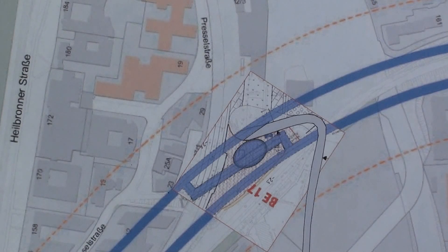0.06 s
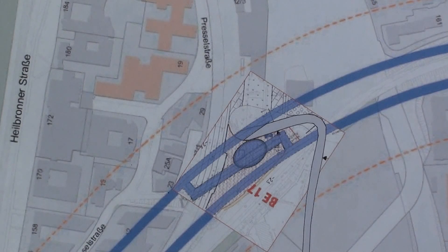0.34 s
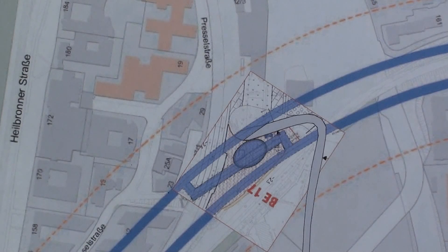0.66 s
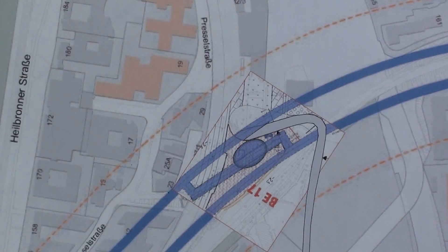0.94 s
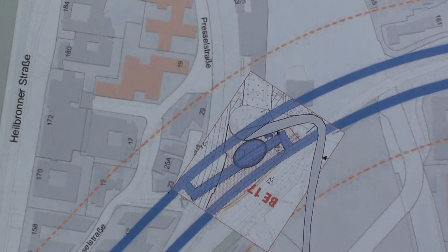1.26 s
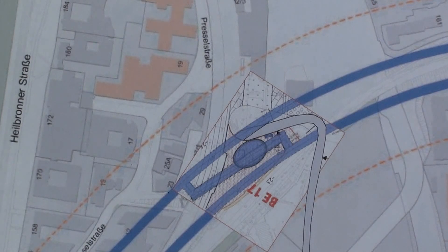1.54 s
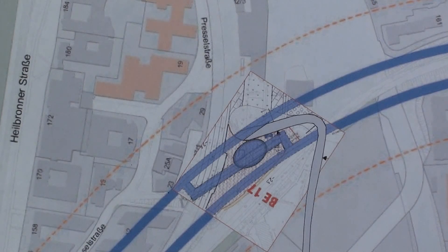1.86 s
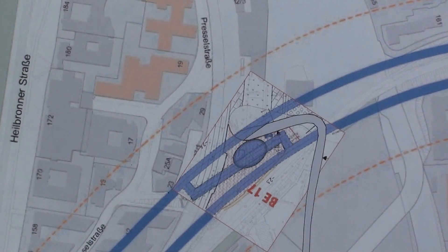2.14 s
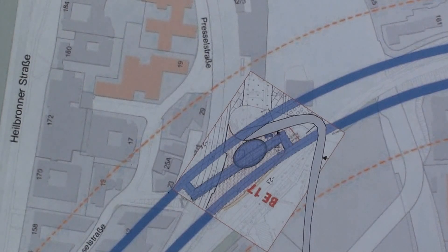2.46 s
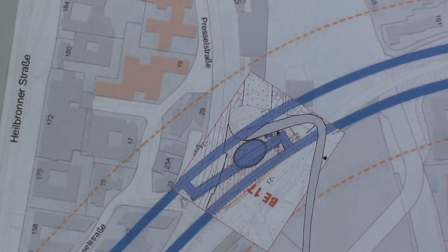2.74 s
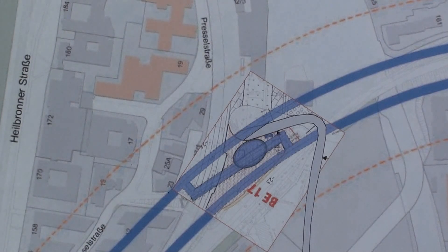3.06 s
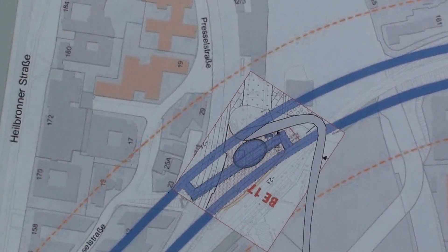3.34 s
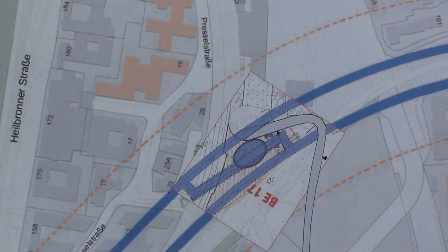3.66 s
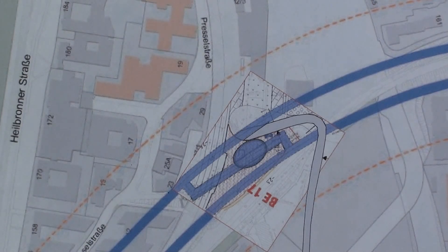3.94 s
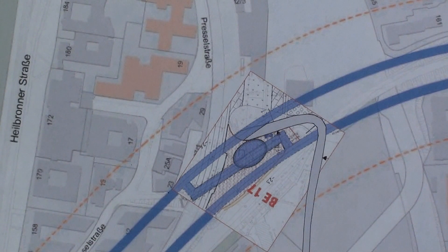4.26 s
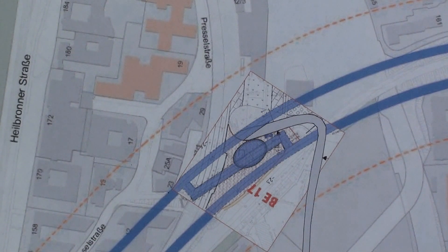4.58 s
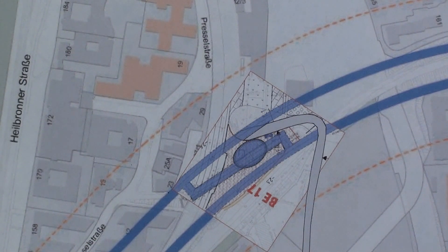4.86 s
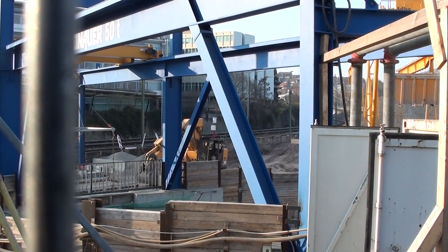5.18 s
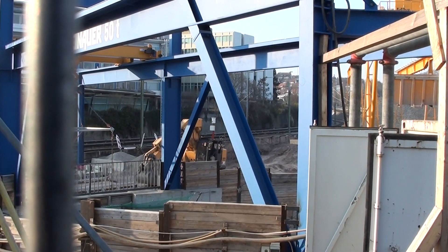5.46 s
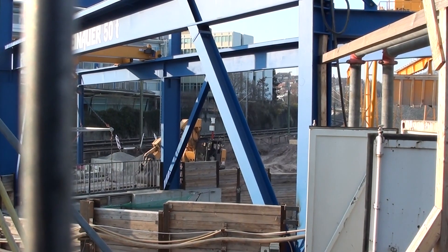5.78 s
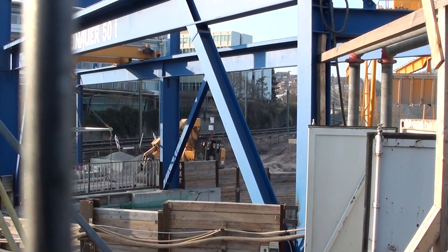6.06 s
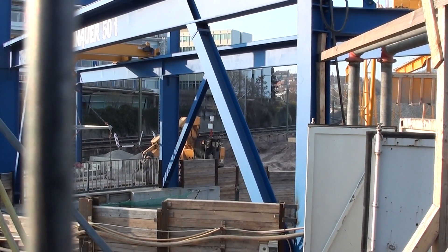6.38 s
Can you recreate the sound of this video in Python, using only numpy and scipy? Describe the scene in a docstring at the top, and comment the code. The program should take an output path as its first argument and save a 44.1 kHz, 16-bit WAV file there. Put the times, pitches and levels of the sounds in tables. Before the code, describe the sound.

Quiet room hiss with tiny lens motor ticks gives way to a rumbling, whining crane and a small bird chirping.

```python
"""First, a quiet room: microphone hiss, a faint ventilation drone and the tiny twitches of a camcorder's
lens motor, each one ringing the lens barrel. Just after five seconds this fades out and a building site
fades in: a gantry crane's machinery rumbles and the switched current of its inverter drive whines.
A small bird chirps three times between the walls, a little grit trickles down, and the bird calls twice
more over the crane."""
import sys
import numpy as np
from scipy import signal
from scipy.fft import rfft, irfft, next_fast_len
from scipy.io import wavfile
from scipy.ndimage import map_coordinates

SR = 44100
rng = np.random.default_rng(int(sys.argv[2]) if len(sys.argv) > 2 else 0)


def materialize(psi):
    """Save the field psi as 16-bit PCM at rate SR to the path in sys.argv[1].

    A 1-D psi becomes a single channel; in a 2-D psi each row is a channel.
    """
    bounded = np.clip(np.atleast_2d(psi).T, -1, 1)
    quanta = np.round(bounded * 32767).astype(np.int16)
    wavfile.write(sys.argv[1], SR, quanta)


N = 283122

# twitches of the lens motor: centre_s, relative_peak_db, length_s
LENS_TWITCHES = [(0.0348, -40, 0.0056), (0.1466, -38, 0.0071), (0.2284, -43, 0.009),
                 (0.4264, -39.5, 0.0058), (0.4634, -39.5, 0.0057), (1.015, -41.5, 0.0068),
                 (1.3399, -46.5, 0.0068), (1.4357, -40, 0.0063), (1.486, -39.5, 0.0072),
                 (1.699, -40.5, 0.006), (1.8173, -39, 0.0068), (2.2385, -37, 0.0064),
                 (2.516, -37.5, 0.0056), (2.6706, -40.5, 0.0095), (3.0111, -38, 0.0061),
                 (3.06, -42.5, 0.0091), (3.1023, -40.5, 0.0068), (3.1787, -44, 0.006),
                 (3.8723, -39.5, 0.0073), (3.9799, -37.5, 0.0074), (4.0405, -39, 0.0063),
                 (4.1265, -49.5, 0.0068), (4.1875, -39.5, 0.0064), (4.626, -38.5, 0.0082),
                 (4.7656, -42, 0.0064), (4.983, -42, 0.006)]
# resonances of the lens barrel: pitch_hz, width_hz, relative_level_db
BARREL_MODES = [(2481, 90, -7.5), (3855, 170, 0), (4750, 180, -7), (5200, 175, -5.5), (5610, 220, -13),
                (8280, 300, -14.5), (8640, 250, -14.5)]
# colour of the crane's rumble: frequency_hz, relative_density_db
RUMBLE_COLOUR = [(15, -46), (25, -27), (54, -10), (172, -8), (238, -0.5), (384, -6.5), (439, -4.5),
                 (595, -5.5), (707, -3.5), (1430, -14), (1580, -15.5), (1730, -16), (2100, -15.5),
                 (2400, -27), (3120, -28), (5280, -120)]
# fader ride on the rumble: time_s, relative_level_db
RUMBLE_RIDE = [(5.15, -28.5), (6.274, -28), (6.4, -29)]
# colour of the machinery's hiss: frequency_hz, relative_density_db
HISS_COLOUR = [(1700, -29), (2300, 3), (3000, 1.5), (4200, -2), (5200, -8.5), (6500, -9.5), (7800, -10.5),
               (9500, -14.5), (12000, -19.5), (15700, -19)]
# stereo image of the site, 1 is mono: frequency_hz, left_right_likeness
SITE_IMAGE = [(60, 1), (200, 0.99), (380, 0.98), (1300, 0.9), (2400, 0.91), (4400, 0.68), (8100, 1),
              (15000, 1)]
# motor and gear tones: pitch_hz, width_hz, level_db
GEAR_TONES = [(41.4, 4.2, -57.5), (68, 4.06, -56), (152, 7.2, -50), (210.6, 8, -48), (231.4, 22, -46),
              (305, 15, -48.5), (2110, 16, -58.5), (3480, 19, -75)]
# steady tones of the crane, a low machinery hum and a line of the inverter's whine: pitch_hz, level_db
STEADY_TONES = [(448.3, -44.5), (1561.3, -55.5)]
# clusters of inverter lines, each built around its strongest:
# carrier_multiple, strongest_offset_drive_multiples, strongest_level_db, fall_per_lower_line_db
WHINE_CLUSTERS = [(1, 3, -52, 20), (2, 2, -55, 2.5), (3, 1, -63.5, 1.8), (4, 0, -62, 2.3),
                  (5, -1, -58.5, 4.6), (5, 5, -59, 8), (6, -2, -72.5, .5)]
# bird calls: start_s, length_s, first_pitch_hz, last_pitch_hz, relative_level_db, pitch_tremble_share
BIRD_CALLS = [(5.198, 0.072, 2970, 3540, -38.5, 0.013), (5.292, .074, 4764, 3245, -36.5, 0.064),
              (5.389, .07, 4460, 3325, -36.5, 0.044), (5.836, .072, 4290, 3600, -40, .028),
              (6.222, 0.09, 4500, 3420, -42, 0.019)]
# falling grit: centre_s, relative_level_db, length_s
GRIT_FALLS = [(5.454, -49.5, .004), (5.525, -47.5, .005), (5.604, -51, .006), (5.641, -49.5, .04)]
# colour of the grit: frequency_hz, relative_density_db
GRIT_SIZZLE = [(4500, -20), (6400, 2), (8000, -3), (11000, -14), (15000, -26)]
# colour of the room tone: frequency_hz, relative_density_db
ROOM_COLOUR = [(12, -51), (20, -26), (76, -8.5), (106, -9), (175, -6.5), (259, -6.5), (631, -6),
               (2400, -11), (3850, -14.5), (4810, -15), (15500, -17.5)]
# stereo image of the room, 1 is mono: frequency_hz, left_right_likeness
ROOM_IMAGE = [(60, 0.93), (130, 0.91), (290, 0.36), (640, -0.27), (1410, -0.12), (3100, 0.33), (6820, 0.81),
              (15000, 1)]
# ventilation drone: pitch_hz, width_hz, level_db
VENT_TONES = [(82, 12, -80.5), (179, 10, -78)]
# faint whistles of the camera's electronics: pitch_hz, width_hz, level_db
CIRCUIT_WHISTLES = [(7499, 3, -86), (10350, 5, -90)]

ROOM_FADE_OUT_S, SITE_FADE_IN_S = (5.062, 5.089), (5.1025, 5.121)


def lens_motor(trim_db=-8.0, idle_db=-71.5, simmer_db=3.5, left_lead_s=.00001):
    """Each twitch is a burst of friction that rings the barrel; in between, the motor only simmers."""
    simmer = rng.standard_normal(N) * amp(simmer_db * wobble(50))
    sound = amp(idle_db) * unit(filtered(simmer, barrel))
    size = 2048
    t = (np.arange(size) - size // 2) / SR
    ring = barrel(np.fft.rfftfreq(size, 1 / SR))
    for centre_s, db, length_s in lens_moves():
        friction = rng.standard_normal(size) * np.exp2(-3 * (t / length_s) ** 2)
        twitch = unit(irfft(rfft(friction) * ring)) * np.sqrt(length_s * SR / size)
        sound[round(centre_s * SR) - size // 2:][:size] += amp(db + trim_db) * twitch
    # the lens sits a little nearer to the left microphone port
    return filtered(sound, lambda hz: np.exp(1j * np.pi * hz * left_lead_s * np.array([[1], [-1]])))


def lens_moves(settle_s=.017, settle_db=-12, scatter_db=0.5, stirs_per_s=1.3, stir_db=-53.5, nudge_s=.0053):
    """Twitches, a softer nudge as each settles, and stray stirs: centre_s, relative_peak_db, length_s."""
    chance = rng.standard_normal((len(LENS_TWITCHES), 2))
    settling = [(s + settle_s * np.exp(.25 * late), db + settle_db + scatter_db * loud, nudge_s)
                for (s, db, _), (late, loud) in zip(LENS_TWITCHES, chance)]
    stir_times = np.cumsum(rng.uniform(.3, 1.7, size=20)) / stirs_per_s
    stirs = [(s, stir_db, nudge_s) for s in stir_times if s < ROOM_FADE_OUT_S[0]]
    return [*LENS_TWITCHES, *settling, *stirs]


def barrel(hz):
    """The lens barrel's ring: one steep-sided hump for each resonance."""
    return sum(amp(db) / (1 + 1j * (hz - pitch) / width) ** 3 for pitch, width, db in BARREL_MODES)


def machinery(trim_db=-1.34, hiss_db=-46, flutter_db=-0.03, lean_left_db=.15):
    """The crane's motors and fans roar, with gear tones, a hum and one inverter line in the noise."""
    t = clock()
    ride = amp(np.interp(t, *np.transpose(RUMBLE_RIDE)) + trim_db + flutter_db * wobble(11))
    steady = sum(amp(db + 1.5 * wobble(5)) * unit(np.sin(2 * np.pi * hz * t + .5 * wobble(6)))
                 for hz, db in STEADY_TONES)
    roar = ride * noise_bed(RUMBLE_COLOUR, SITE_IMAGE) + drones(GEAR_TONES) + steady
    hiss = amp(hiss_db) * noise_bed(HISS_COLOUR, SITE_IMAGE)
    return roar * amp([[lean_left_db], [-lean_left_db]]) + hiss


def inverter(waver_db=1.5, drift_rad=0.11, spread_rad=0.29):
    """Switched motor current sings at carrier multiples, split into sidebands that beat together."""
    t, whine = clock(), np.zeros((2, N))
    for hz, db in sidebands():
        # reflections in moving air shift each line's phase and strength
        phase = 2 * np.pi * (hz * t + rng.random()) + drift_rad * wobble(6.7)
        stereo_offset = spread_rad * rng.standard_normal() * np.array([[1], [-1]])
        whine += amp(db + waver_db * wobble(5)) * np.sqrt(2) * np.sin(phase + stereo_offset)
    return whine


def sidebands(carrier_hz=1500.2, drive_hz=20.42, each_side=3, upper_steepness=1.95):
    """Inverter lines twice the drive frequency apart, falling faster upward: pitch_hz, level_db."""
    return [(multiple * carrier_hz + (offset + 2 * step) * drive_hz,
             db - fall_db * max(-step, upper_steepness * step))
            for multiple, offset, db, fall_db in WHINE_CLUSTERS
            for step in range(-each_side, each_side + 1)]


def bird(trim_db=-3, scoop_s=0.00818, scoop_share=.14, glide_ease=1.6, break_db=-10):
    """Two-syllable whistles scoop up, then ease to their last pitch, trembling into a rasp."""
    song = np.zeros(N)
    tremble, rasp = wobble(800), unit(amp(3 * wobble(300)))
    for start_s, length_s, first_hz, last_hz, db, shake in BIRD_CALLS:
        progress = np.linspace(0, 1, round(length_s * SR))
        note = slice(round(start_s * SR), round(start_s * SR) + len(progress))
        scoop_end = scoop_s / length_s
        scoop = np.interp(progress, [0, scoop_end], [1 - scoop_share, 1])
        glide = np.expm1(-glide_ease * np.interp(progress, [scoop_end, 1], [0, 1])) / np.expm1(-glide_ease)
        pitch = (first_hz + (last_hz - first_hz) * glide) * scoop * (1 + shake * tremble[note])
        # a dip just before halfway splits the syllables
        dip_db = break_db * np.exp(-((progress - 0.47) / 0.07) ** 2)
        envelope = amp(db + trim_db + dip_db) * np.sqrt(2 * np.abs(np.sin(np.pi * progress)))
        song[note] += envelope * np.sin(2 * np.pi * np.cumsum(pitch) / SR)
    return song * rasp


def site_walls(sound, t60_s=0.19, wet_db=-1, width=0.36, build_s=0.0065):
    """Walls and steelwork scatter a sound into a short stereo tail."""
    t = np.arange(SR // 2) / SR
    mid, side = rng.standard_normal((2, len(t))) * amp(-60 * t / t60_s) * (1 - np.exp(-t / build_s))
    tail = np.array([mid + width * side, mid - width * side])
    wet = signal.fftconvolve(sound[None], tail / np.linalg.norm(tail[0]), axes=1)[:, :N]
    return sound + amp(wet_db) * wet


def grit(grain_db=3):
    """Grit falls in three tiny ticks and a short grainy trickle."""
    t = clock()
    # bell-shaped bursts, length_s wide at half power
    power = sum(amp(db) ** 2 * np.exp2(-np.minimum((2 * (t - centre_s) / length_s) ** 2, 60))
                for centre_s, db, length_s in GRIT_FALLS)
    grains = unit(noise_bed(GRIT_SIZZLE, SITE_IMAGE) * amp(grain_db * wobble(790)))
    return np.sqrt(power) * grains


def quiet_room(hiss_db=-58.5):
    """Room tone: microphone hiss over a faint ventilation drone and thin electronic whistles."""
    hiss = amp(hiss_db) * noise_bed(ROOM_COLOUR, ROOM_IMAGE)
    return hiss + drones(VENT_TONES) + drones(CIRCUIT_WHISTLES)


def noise_bed(colour, image):
    """Stereo noise of rms 1 with a given colour and stereo image."""
    def mid_side_eq(hz):
        angle = np.arccos(np.clip(curve_at(image, hz), -1, 1)) / 2
        return amp(curve_at(colour, hz)) * [np.cos(angle), np.sin(angle)]
    mid, side = filtered(rng.standard_normal((2, N)), mid_side_eq)
    return unit(np.array([mid + side, mid - side]))


def drones(tones):
    """Tones whose strength and phase wander, each as fast as its width."""
    turns = 2 * np.pi * clock()
    return sum(amp(db) * unit(wobble(width) * np.cos(hz * turns) + wobble(width) * np.sin(hz * turns))
               for hz, width, db in tones)


def wobble(knots_per_s):
    """A smooth random modulator of rms 1."""
    knots = rng.standard_normal(int(N * knots_per_s / SR) + 4)
    return unit(map_coordinates(knots, [clock() * knots_per_s]))


def filtered(x, response):
    """x through an EQ given as a function of frequency."""
    size = next_fast_len(N + SR // 2)
    return irfft(rfft(x, size) * response(np.fft.rfftfreq(size, 1 / SR)), size)[..., :N]


def curve_at(points, hz):
    """Read a breakpoint curve along a log frequency axis."""
    point_hz, values = np.transpose(points)
    return np.interp(np.log(hz + 1), np.log(point_hz + 1), values)


def amp(db):
    """Decibels to gain."""
    return 10 ** (np.asarray(db) / 20)


def unit(x):
    """x at rms 1."""
    return x / np.sqrt(np.mean(x ** 2) + 1e-20)


def clock():
    """Every sample's time in seconds."""
    return np.arange(N) / SR


def scene():
    """The room fades out, then the site fades in."""
    indoors = quiet_room() + lens_motor()
    outdoors = machinery() + inverter() + site_walls(bird()) + grit()
    fade_out = np.interp(clock(), ROOM_FADE_OUT_S, [1, 0]) ** 2
    fade_in = np.interp(clock(), SITE_FADE_IN_S, [0, 1]) ** 2
    return indoors * fade_out + outdoors * fade_in


def record(dry, top_hz=15800):
    """The camera's band limit is a brick-wall high cut."""
    return filtered(dry, lambda hz: hz < top_hz)


dry = scene()
out = record(dry)
materialize(out)
```